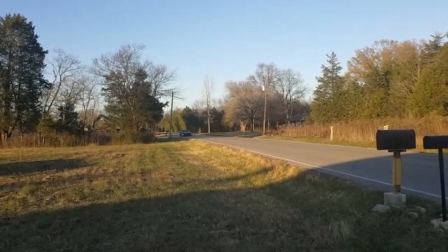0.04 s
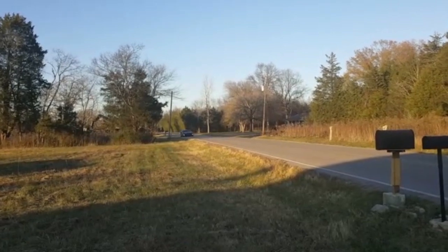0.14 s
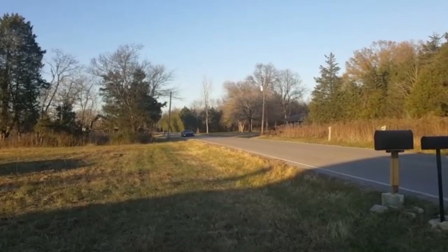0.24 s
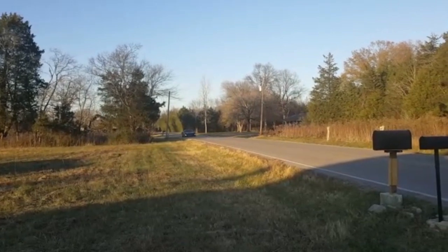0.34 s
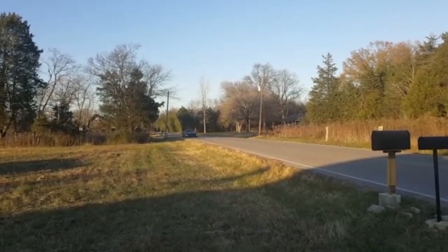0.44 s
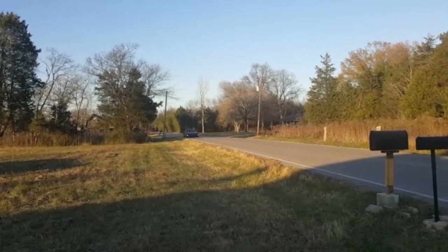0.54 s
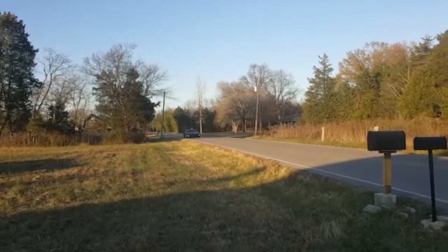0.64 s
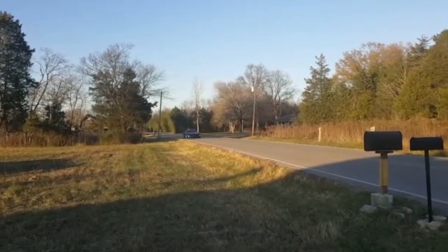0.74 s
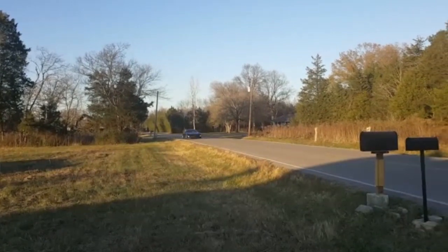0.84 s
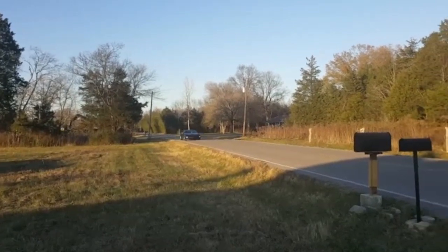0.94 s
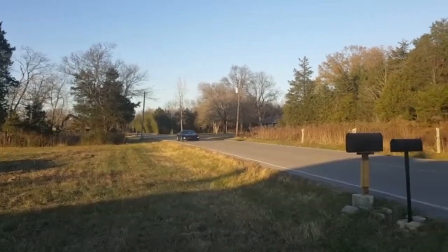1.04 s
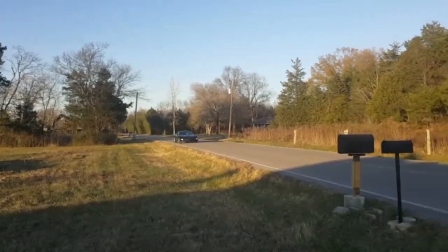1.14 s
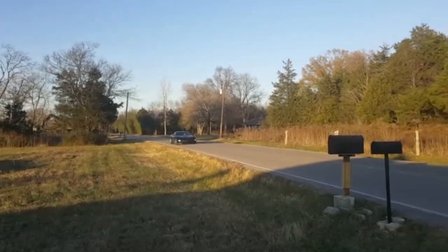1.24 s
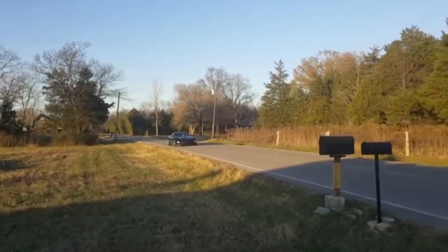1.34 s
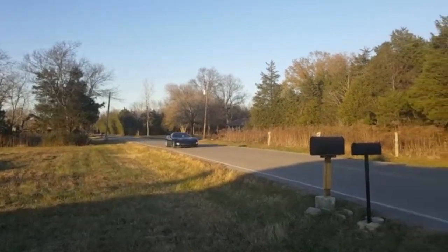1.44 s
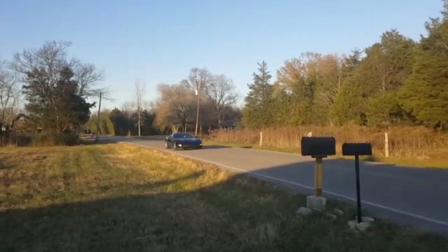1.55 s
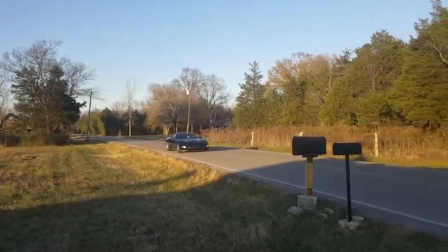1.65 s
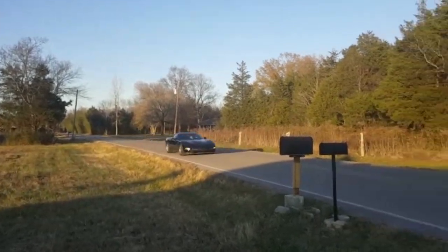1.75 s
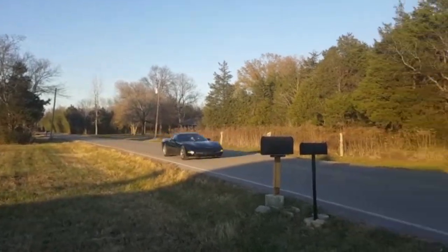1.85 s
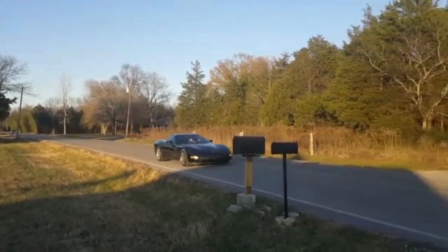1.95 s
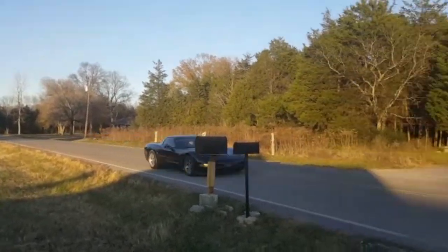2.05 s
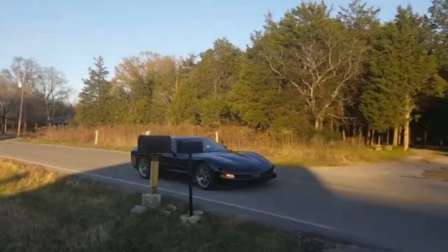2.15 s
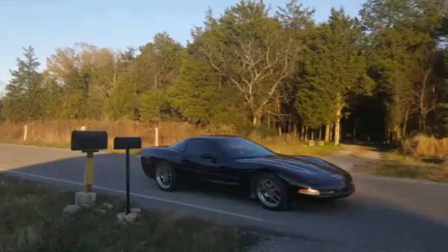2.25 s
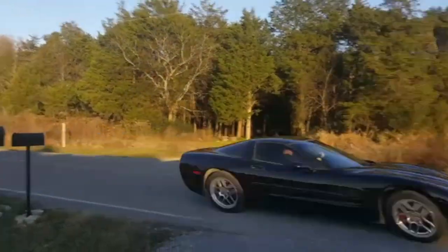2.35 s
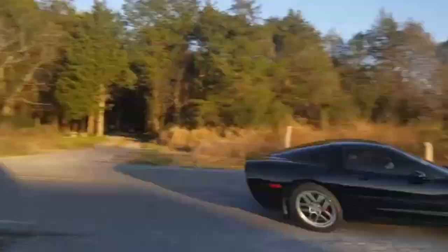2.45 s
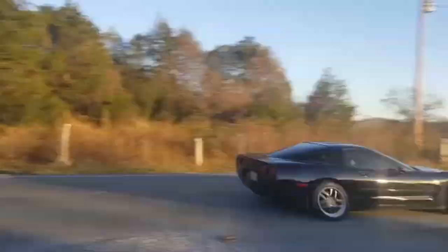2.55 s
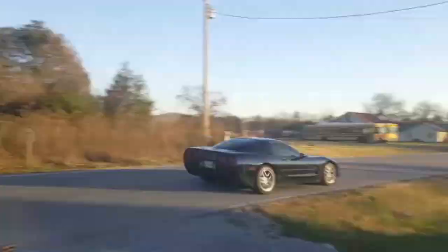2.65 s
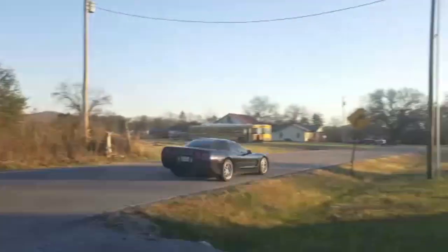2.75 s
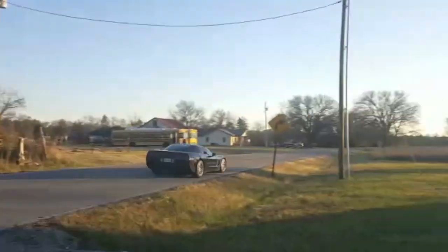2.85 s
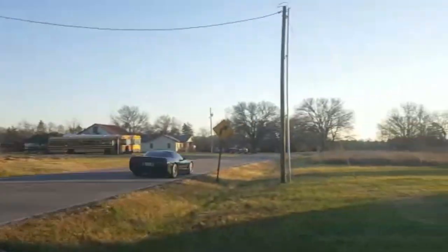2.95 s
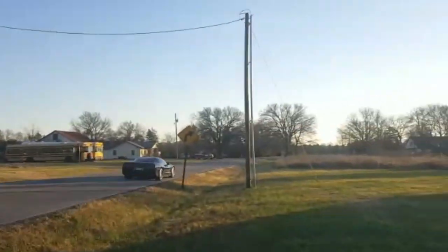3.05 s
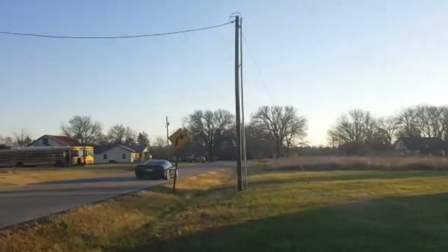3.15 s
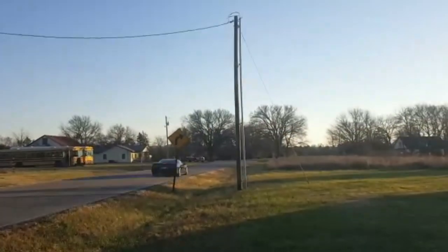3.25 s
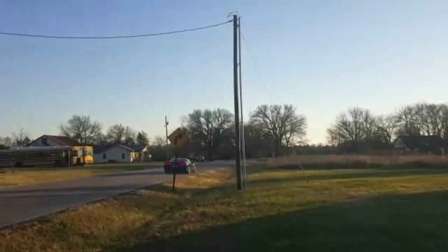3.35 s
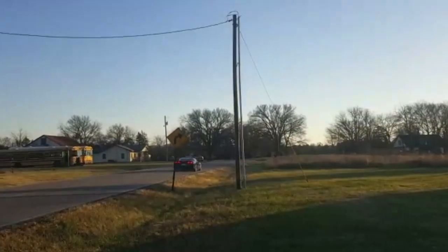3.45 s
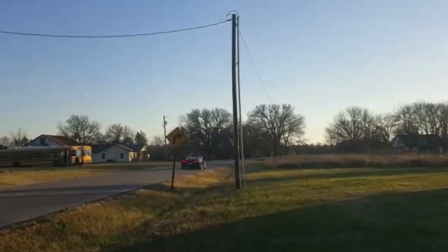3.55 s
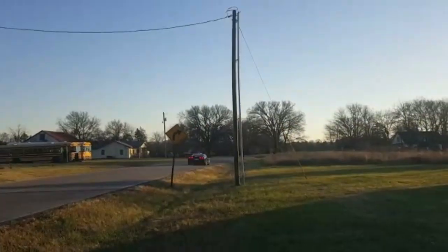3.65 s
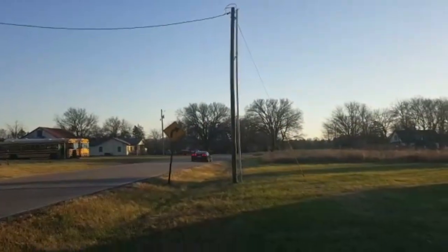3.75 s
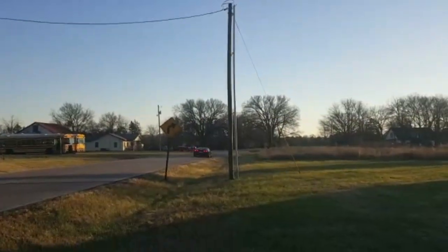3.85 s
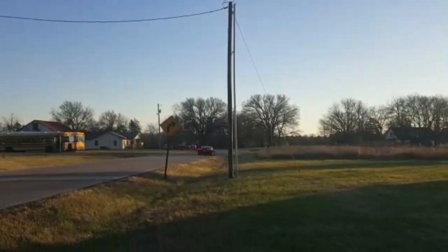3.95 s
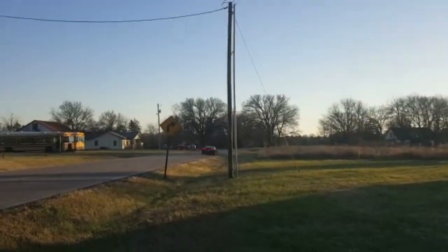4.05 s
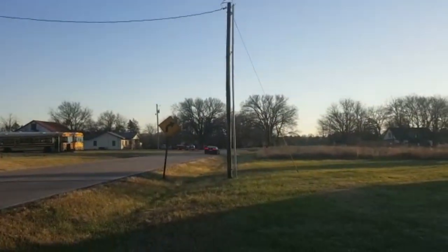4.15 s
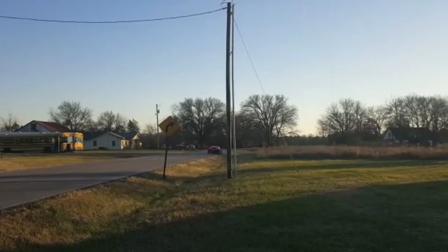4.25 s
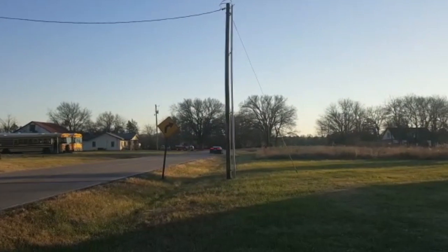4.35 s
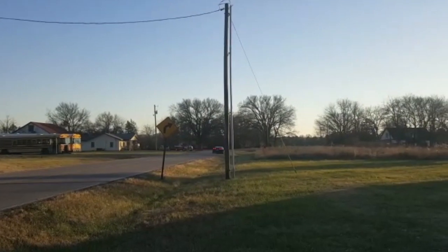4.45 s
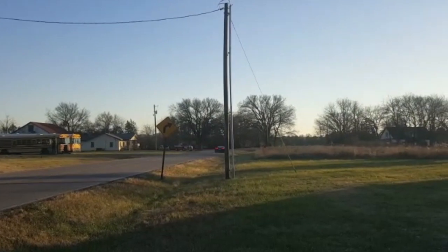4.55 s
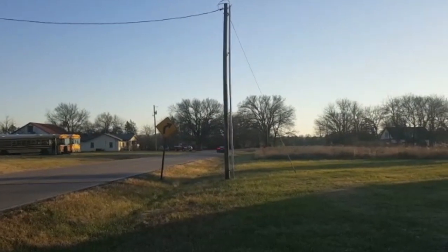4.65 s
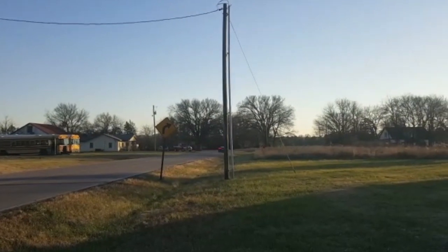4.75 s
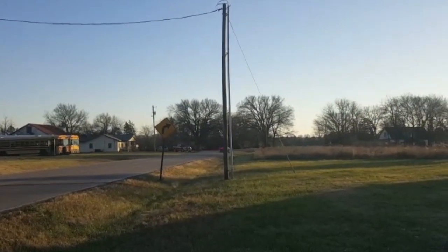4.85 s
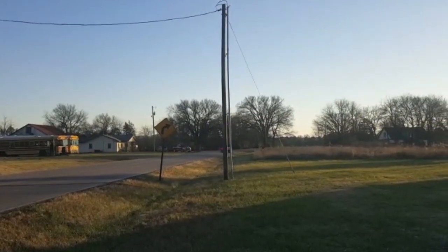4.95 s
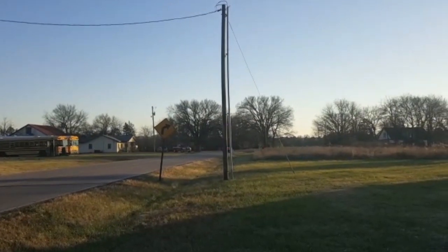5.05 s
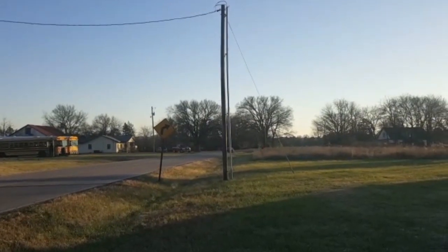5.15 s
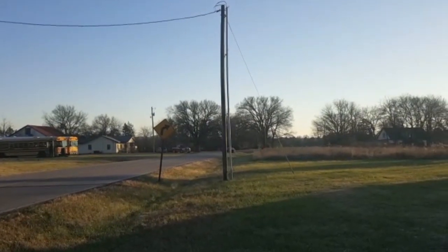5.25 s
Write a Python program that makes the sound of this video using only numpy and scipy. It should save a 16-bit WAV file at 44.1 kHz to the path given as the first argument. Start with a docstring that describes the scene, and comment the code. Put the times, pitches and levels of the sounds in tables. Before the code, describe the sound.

Distant V8 hum bursts into full-throttle roar, blasts by very close with a sharp pitch fall, stumbles briefly, then growls into the distance.

```python
"""A country road, microphone at the verge: a V8 car with open pipes cruises up, opens the throttle and passes
close by. Uneven firings sum engine orders into a deep burble and pulse filtered noise into a cracking rasp;
shock fronts ring bright resonances, and knocks and thumps ring the pipes. Doppler lowers the pitch as it
passes, and the beat changes with the load. Clean overtones and forward-thrown whines go with it; tyre hiss and
low wind are shaped noise. Ground and trees return echoes, and the loudest peaks at the two microphone ports are
squashed."""
import sys
import numpy as np
from scipy import signal
from scipy.fft import rfft, irfft, next_fast_len
from scipy.io import wavfile
from scipy.ndimage import uniform_filter1d, map_coordinates

SR = 44100
rng = np.random.default_rng(int(sys.argv[2]) if len(sys.argv) > 2 else 0)


def unload_wav(signal):
    """Save mono or channel-first audio to the path in sys.argv[1] as 16-bit WAV at rate SR, clipped to [-1, 1]."""
    wavfile.write(
        sys.argv[1],
        SR,
        np.round(np.clip(np.atleast_2d(signal).T, -1, 1) * 32767).astype(np.int16),
    )


N = 234283

# The exhaust's voice goes cruising, charging, alongside, leaving, far off. Start of each later phase: (time [s])
PHASE_STARTS = [0.886, 2.362, 2.735, 3.875]
# The drive past: road speed, moment the tailpipes are abreast of the microphone, closest distance
CAR_M_PER_S, PASS_S, NEAREST_M = 27.7, 2.606, 2.02
SOUND_M_PER_S = 343


def from_db(db):
    """Decibels to an amplitude factor."""
    return 10 ** (np.asarray(db) / 20)


def rms_one(x):
    """Scale a sound to an rms of 1."""
    return x / np.sqrt(np.mean(x ** 2) + 1e-20)


def in_time(rows):
    """Each column of a timed curve, interpolated at every sample."""
    s, *columns = np.transpose(rows)
    return [np.interp(np.arange(N) / SR, s, column) for column in columns]


def drift(rate_hz):
    """Slow chance with spread 1: noise through two equal low-pass poles, made at every 40th sample."""
    r = np.exp(-80 * np.pi * rate_hz / SR)
    slow = signal.lfilter([1], [1, -2 * r, r * r], rng.standard_normal(N // 40 + 2002))
    slow = slow[2000:]  # skip the filter's start
    return np.interp(np.arange(N) / 40, np.arange(len(slow)), rms_one(slow))


def swell(s, half_width_s):
    """A bell-shaped rise and fall of height 1."""
    return np.exp(-((np.arange(N) / SR - s) / half_width_s) ** 2)


def colour(x, points, power=1):
    """Shape a sound by a smooth (frequency [Hz], gain [dB]) spectrum; power scales the dB."""
    size = next_fast_len(N + 4096, True)
    hz, db = np.transpose(points)
    bins = np.maximum(np.arange(size // 2 + 1) * SR / size, 1)
    gain = from_db(power * np.interp(np.log(bins), np.log(hz), db))
    return irfft(rfft(x, size) * gain, size)[..., :N]


def butter(x, hz, kind, order=2):
    """Pass a sound through a Butterworth filter."""
    return signal.sosfilt(signal.butter(order, hz, kind, fs=SR, output="sos"), x)


def steady(x):
    """Even out slow swells of a (mid, side) pair, keeping its pulses."""
    power = uniform_filter1d(uniform_filter1d(x[0] ** 2, size=2600), size=2600)
    return x / np.sqrt(np.abs(power) + 1e-20)


def delayed(x, lag_ms):
    """Read a sound through a delay that changes with time."""
    return map_coordinates(x, [np.arange(N) - lag_ms * SR / 1000], order=3, mode="nearest")


def ports(pair):
    """Two takes on one sound become (mid, side): the ports differ most in deepest bass and top treble."""
    # Sound the two ports do not share: (frequency [Hz], side gain [dB])
    port_spread = [(60, 1), (150, -21), (300, -6.5), (640, -14.5), (1400, -8), (3100, -6), (6800, 0.5),
                   (15000, 3)]
    return np.array([pair[0], colour(pair[1], port_spread)])


def noise(spectrum):
    """Coloured (mid, side) noise whose mid has spread 1."""
    x = ports(colour(rng.standard_normal((2, N)), spectrum))
    return x / np.std(x[0])


def position(lead_m=0):
    """Nearness (1 when abreast) and heading (-1 coming, +1 going) of a point on the car."""
    along = CAR_M_PER_S * (np.arange(N) / SR - PASS_S) + lead_m
    distance = np.hypot(along, NEAREST_M)
    return NEAREST_M / distance, along / distance


def phase_shares(blend_s=0.091):
    """Equal-power cross-fades between the five phases."""
    t = np.arange(N) / SR
    later = [np.clip((t - s) / blend_s + .5, 0, 1) for s in PHASE_STARTS]
    begun = [np.ones(N)] + later + [np.zeros(N)]
    return np.sqrt(np.maximum(-np.diff(begun, axis=0), 0))


def by_phase(rows, shares):
    """A level that starts afresh in each phase and slides at a steady rate (dB)."""
    t = np.arange(N) / SR
    return sum(share ** 2 * (db + db_per_s * (t - start))
               for share, start, (db, db_per_s) in zip(shares, [0, *PHASE_STARTS], rows))


def exhaust_levels(shares):
    """Levels (dB) of the note's firing tone, burble and rumble, and of the jet's bark, rasp and sizzle."""
    # Deep exhaust note, then sizzle of the gas jet, once the throttle has opened: (time [s], level [dB])
    note_level = [(0.9, -28), (0.925, -23), (0.95, -27), (1.31, -19.5), (2.12, -14.5), (2.31, -20.5),
                  (2.44, -9), (2.51, -12), (2.54, -14), (2.622, -7.5), (2.66, -20), (2.7, -9),
                  (2.76, -20.5), (2.83, -18), (2.9, -19), (3.1, -20), (3.81, -17), (3.845, -26.5),
                  (3.909, -19.5), (3.98, -16), (4.38, -14), (5.08, -13.5), (5.17, -13.5), (5.259, -16.5),
                  (5.31, -17.5)]
    sizzle_level = [(0.92, -43), (1.41, -26), (1.8, -25.5), (2.25, -34), (2.48, -26.5), (2.53, -23.5),
                    (2.58, -23.5), (2.632, -36.5), (2.77, -43.5), (3.05, -35), (3.461, -35), (3.57, -31.5),
                    (3.845, -32), (3.885, -40), (4.0, -34), (4.99, -43.5), (5.31, -46)]
    # One row a phase: firing tone over burble, then rumble re the note: (start level [dB], slope [dB/s])
    tone_over_burble = [(-36, 4), (-14.5, 14.5), (12.5, 6), (-18, 5), (-9.5, 13.5)]
    rumble_share = [(0, -9), (2, -13.5), (-17, -11.5), (-13.5, -2), (-21.5, 2.5)]
    # Jet bark and rasp at the usual sizzle, one row a phase: (start level [dB], slope [dB/s])
    bark_level = [(-35, 7), (-23.5, -3), (-22, -14), (-29, -5.5), (-32.5, 5)]
    rasp_level = [(-32.5, 1), (-29, 5), (-27.5, -4.5), (-30.5, -2.5), (-31, 3)]
    # Short surges: (time [s], half-width [s], extra rumble [dB], extra bark [dB], extra rasp [dB])
    surges = [(.922, 0.0051, 8, -2, 5.5), (2.535, 0.046, 19.5, 7, -5), (2.585, 0.026, -2, 1.5, 7.5),
              (2.652, 0.011, 13.5, 9, -3), (2.85, 0.25, 12, 3, 5), (3.68, 0.086, 2.5, 2.5, 4.5),
              (3.861, 0.043, 9, 10, 2), (5.069, 0.099, -11, 3, 6)]
    t, cruising = np.arange(N) / SR, shares[0] ** 2
    # Both creep up while cruising: dB at the start, then dB per s
    cruise_note = -41 + 7.4 * t
    cruise_sizzle = -63.5 + 1.0 * t
    note = cruising * cruise_note + (1 - cruising) * in_time(note_level)[0]
    sizzle = cruising * cruise_sizzle + (1 - cruising) * in_time(sizzle_level)[0]
    more_rumble, more_bark, more_rasp = sum(
        np.outer(extra_db, swell(s, width)) for s, width, *extra_db in surges)
    tone = by_phase(tone_over_burble, shares)
    rumble = by_phase(rumble_share, shares) + more_rumble
    # Share the note's power between its parts
    lines = note - 10 * np.log10(1 + from_db(rumble) ** 2)
    burble = lines - 10 * np.log10(1 + from_db(tone) ** 2)
    # The lower jet bands follow part of the sizzle's swing
    swing = sizzle - np.median(sizzle)
    bark = by_phase(bark_level, shares) + 0.5 * swing + more_bark
    rasp = by_phase(rasp_level, shares) + 0.73 * swing + more_rasp
    return (burble + tone, burble, lines + rumble), (bark, rasp, sizzle)


def ring_angles(orders, size=64):
    """A pipe rings after its blast, never before: minimum phase of each order."""
    k, db = np.transpose(orders)
    log_gain = np.interp(np.arange(size // 2 + 1), [0, *k, 18], [-40, *db, -40]) * np.log(10) / 20
    return rfft(2 * irfft(log_gain)[:size // 2], size).imag


def exhaust_note(turns, shares, levels, waver_db=1.56, firing_waver_db=2.5, firing_db=-0.23,
                 burble_db=0.0, rumble_db=-0.5, settle=0.34):
    """The firing tone, the other orders that the uneven banks add, and turbulence between them."""
    # Burble, one list a phase, scaled to a common power: (multiple of the cycle rate, relative level [dB])
    burble_orders = [
        [(2, -19), (3, -5.5), (4, -1), (5, 3.5), (6, -25), (7, -6.5), (9, -40), (10, -22)],
        [(2, -23), (3, -16), (4, -24), (5, -6), (6, -0.5), (7, -9.5), (9, -22), (10, -23), (11, -19.5),
         (13, -18.5)],
        [(2, -42), (3, -30), (4, -48), (5, -23.5), (6, -13.5), (7, -24), (9, -29), (10, -18.5), (11, -18),
         (12, -28)],
        [(3, -8), (4, -0.5), (5, 7), (6, 8), (7, 0.5), (9, -22.5), (10, -8), (11, -17), (12, -11.5), (13, -61)],
        [(3, -17), (4, -6), (5, -8), (6, 3), (7, -14.5), (9, -10), (10, -29.5), (12, -16.5), (13, -30.5)],
    ]
    # Turbulent rumble: (frequency [Hz], relative level [dB])
    rumble_spectrum = [(35, -45.5), (70, -23.5), (120, 10.5), (200, 16.5), (290, 11.5), (380, 2), (480, -4),
                       (700, -54)]
    firing, burble, rumble = levels
    angle = 2 * np.pi * turns
    unrest = 1 - settle * (shares[3] ** 2 + shares[4] ** 2)  # the beat is steadier once the car has passed
    waver = {k: from_db(waver_db * unrest * drift(6)) for k in range(2, 14)}
    beat = np.zeros(N)
    for share, orders in zip(shares, burble_orders):
        on, lead = share > 0, ring_angles(orders)
        total = np.sqrt(sum(from_db(db) ** 2 for k, db in orders) / 2)
        for k, db in orders:
            k = round(k)
            wave = np.cos(k * angle[on] + lead[k] + np.pi / 2)
            beat[on] += (share * waver[k])[on] * from_db(db) / total * wave
    tone_db = firing + firing_db + firing_waver_db * unrest * drift(12)
    tone = np.sqrt(2) * np.cos(8 * angle + np.pi / 6) * from_db(tone_db)  # eight firings a cycle
    lines = tone + beat * from_db(burble + burble_db)
    return lines * [[1], [0]] + steady(noise(rumble_spectrum)) * from_db(rumble + rumble_db)


def blasts(turns, strengths_db, decay, flow, scatter_db):
    """Each firing opens with a jump and dies away over the steady flow."""
    count, age = np.divmod(8 * turns, 1)
    count = count.astype(int)
    scatter = scatter_db * rng.standard_normal(count[-1] + 1)
    size = from_db(np.resize(strengths_db, count[-1] + 1) + scatter)
    return flow + size[count] * np.exp(-age / decay)


def gas_jet(turns, shares, levels, repeat_db=0.0, repeat_hz=1700, bark_db=-1.0, rasp_db=-3.0,
            sizzle_db=2.0, flicker_db=0.88, morph_hz=.5):
    """Blasts carry a slowly changing ripple that repeats each cycle; fresh turbulence rules the treble."""
    # Eight firings of the cycle, one row a phase: (relative strength [dB]) in each column
    firing_strengths = [
        [0, -3, -4, -2, 0, -3, -4, -2],
        [0, -2, -3, -1, 0, -1, -3, -2],
        [0, -2, -3, -1, 0, -1, -3, -2],
        [0, -8, -5, -8, -6, -7, -8, -12],
        [0, -2, -5, -8, 0, -1, -6, -8],
    ]
    # One row a phase: (decay [firing intervals], steady flow [amplitude], scatter [dB, sign immaterial])
    blast_shapes = [(0.99, 1, -1), (1, 1, -1), (0.62, 1, 4), (0.25, 0.33, 2.5), (0.75, 0.97, 5)]
    # Jet colour in each phase: (frequency [Hz], relative level [dB])
    cruise_colour = [(240, -31), (400, -4), (477, -7), (496, -13), (553, -7), (714, -11.5), (1960, -19.5),
                     (2530, -16), (7240, -49), (10000, -53), (13000, -77), (22000, -120)]
    charge_colour = [(240, -52), (400, -22), (538, -2), (591, 0), (760, 3), (1110, 0.5), (1210, -3.5),
                     (1360, -2.5), (1540, -0.5), (1670, -1.5), (2640, -5.5), (3450, -16), (4460, -19),
                     (7140, -34.5), (8280, -29.5), (10300, -54.5), (12000, -32), (15000, -46),
                     (22000, -120)]
    beside_colour = [(290, -19), (490, -15.5), (689, -15), (753, -1.5), (843, -18), (956, -4), (1100, -17),
                     (1750, 1), (2070, -3.5), (3250, -12.5), (10000, -38), (13000, -56), (22000, -120)]
    leave_colour = [(240, -38.5), (400, -13.5), (470, -2), (641, -2), (704, 2.5), (1190, -4), (1310, -12.5),
                    (1760, 0.5), (2100, -7), (2530, -8), (3640, -11), (4580, -17.5), (7140, -35),
                    (8170, -28.5), (10000, -55.5), (13000, -75), (22000, -120)]
    far_colour = [(240, -38), (400, 5), (510, -14.5), (641, -11.5), (753, -2.5), (1080, -4), (1500, -6.5),
                  (1760, 0), (2100, -10), (2640, -11.5), (3060, -11.5), (4340, -21), (7050, -44.5),
                  (8170, -40), (10000, -58.5), (13000, -95), (22000, -120)]
    colours = (cruise_colour, charge_colour, beside_colour, leave_colour, far_colour)
    size = 1024  # points of ripple in a cycle
    shapes = rng.standard_normal((2, 2, size))[..., (turns % 1 * size).astype(int)]
    morph = 2 * np.pi * morph_hz * np.arange(N) / SR
    ripple = shapes[0] * np.cos(morph) + shapes[1] * np.sin(morph)
    loaded = 1 - 0.44 * shares[0]  # on light throttle the cycles are less alike
    repeating = loaded * from_db(repeat_db) * butter(ripple, repeat_hz, "low", order=1)
    gas = repeating + rng.standard_normal((2, N))
    jet = 0
    for share, firings, shape, spectrum in zip(shares, firing_strengths, blast_shapes, colours):
        jet = jet + share * rms_one(colour(gas * blasts(turns, firings, *shape), spectrum))
    jet = ports(jet)
    bands = ((460, 1200), (1200, 3000), (3000, 9500))  # bark, rasp and sizzle, Hz
    return sum(steady(butter(jet, band, "band", order=4)) * from_db(level + trim + flicker_db * drift(15.0))
               for band, level, trim in zip(bands, levels, (bark_db, rasp_db, sizzle_db)))


def each_cycle(turns, rows, level_db, scatter_db):
    """Clicks that return at the same place in every engine cycle, with a little scatter in strength."""
    clicks = np.zeros(N)
    for start, end, place, db in rows:
        at = np.flatnonzero(np.diff(np.floor(turns - place / 8)))
        heard = (at > start * SR) & (at < end * SR)
        scatter = scatter_db * rng.standard_normal(256)[:len(at)]
        clicks[at] += heard * from_db(level_db[at] + db + scatter)
    return clicks


def shocks(turns, levels, scatter_db=1.1, mode_scatter_db=1.5, front_s=0.00015, front_db=2,
           puff_s=0.0007, puff_db=-11):
    """The strongest blasts steepen into shock fronts: a spike and a small puff that ring a few bright
    resonances."""
    # Once-a-cycle fronts: (from [s], to [s], place in cycle [firing intervals], click re sizzle level [dB])
    shock_runs = [(2.96, 3.45, -0.17, 20.5), (3.45, 3.85, -0.17, 22), (2.92, 3.82, 1.5, 18.5),
                  (3.5, 3.85, 4.3, 14), (3.93, 4.45, 0.15, 16), (3.93, 5.31, 4.05, 13.5)]
    # Single louder cracks: (time [s], click level before ringing [dB])
    cracks = [(.886, -31), (.912, -27), (2.553, -14), (2.571, -11), (2.585, -11), (2.642, -19),
              (2.697, -19), (3.2202, -19), (3.2778, -17), (3.3423, -15), (3.6007, -16), (3.69, -15),
              (3.707, -16), (3.8097, -16), (3.9439, -14), (4.2128, -17), (5.119, -20)]
    # Resonances the fronts ring: (frequency [Hz], width [Hz], level from near [dB], level from far [dB])
    ring_modes = [(1760, 110, -4, 5), (2550, 300, 0, -4), (3050, 280, -6, 11), (3650, 450, 4, 5),
                  (4400, 750, 13, 4)]
    t = np.arange(N) / SR
    clicks = each_cycle(turns, shock_runs, levels[2], scatter_db)
    for s, db in cracks:
        clicks[round(s * SR)] += from_db(db)
    front, puff = (signal.lfilter([1], [1, -np.exp(-1 / (decay * SR))], clicks + 1e-18)
                   for decay in (front_s, puff_s))
    burst = front * [[1], [0]] + from_db(puff_db) * puff * rng.standard_normal((2, N))
    far = np.clip((t - 3.48) / .35 + .5, 0, 1)  # near ring turns to far ring around 3.48 s, over .35 s
    out = from_db(front_db) * burst
    for hz, width, near_db, far_db in ring_modes:
        r = np.exp(-np.pi * width / SR)
        poles = [1, -2 * r * np.cos(2 * np.pi * hz / SR), r * r]
        rung = signal.lfilter(np.array([1, 0, -1]) * (1 - r * r) / 2, poles, burst)
        out = out + rung * from_db(near_db + (far_db - near_db) * far + mode_scatter_db * drift(23))
    out = (1 - far) * out + far * butter(out, 5000, "low", order=4)  # distance takes the edge off
    return ports(butter(butter(out, 500, "high"), 7200, "low", order=8))


def knocks(turns, levels, level_db=0.0, scatter_db=1.0, mode_waver_db=1.5):
    """Heard from behind, blunter blows ring the lower pipe modes much alike each cycle: a stack of clean lines."""
    # Once-a-cycle blows: (from [s], to [s], place in cycle [firing intervals], click re bark level [dB])
    knock_runs = [(2.95, 3.2, -0.1, 11.5), (2.87, 3.85, 1.85, 9), (2.87, 3.85, 3.3, 8),
                  (3.15, 3.85, 4.55, 9), (3.2, 3.85, 0.5, 9), (3.94, 4.35, 4.65, 16),
                  (4.35, 5.31, 4.65, 13), (4.1, 5.31, 3.9, 12), (4.1, 5.31, 0.7, 13.5),
                  (4.85, 5.31, -0.15, 9)]
    # Lower pipe modes: (frequency [Hz], width [Hz], level [dB])
    knock_modes = [(670, 230, -3.5), (930, 260, -4.5), (1110, 300, -8)]
    clicks = each_cycle(turns, knock_runs, levels[0] + level_db, scatter_db)
    out = 0
    for hz, width, db in knock_modes:
        r, w = np.exp(-np.pi * width / SR), 2 * np.pi * hz / SR
        poles = [1, -2 * r * np.cos(w), r * r]
        rung = signal.lfilter([1, -np.cos(w) * r], poles, clicks + 1e-18)
        out = out + from_db(db + mode_waver_db * drift(3.4)) * rung
    return butter(out, [430, 1500], "band") * [[1], [0]]


def thumps(rise_s=.005):
    """Each thump swells within about a cycle of the pipes' lowest ring and dies in a few more."""
    # Deep single thumps, most as the engine stumbles: (time [s], ring [Hz], envelope peak [dB])
    thump_rows = [(2.845, 235, -13), (3.837, 217, -8), (3.856, 215, -10.5), (3.881, 215, -9),
                  (3.917, 215, -13)]
    out = np.zeros(N)
    for s, hz, db in thump_rows:
        age = np.maximum(np.arange(N) / SR - s, 0)
        envelope = age / rise_s * np.exp(1 - age / rise_s)
        out += from_db(db) * envelope * np.cos(2 * np.pi * hz * age)
    return butter(out, 120, "high") * [[1], [0]]


def overtones(turns, level_db=-0.5, fade_db=1.5, wander=0.18):
    """Clean engine orders, each a sine locked to the cycle that swells and fades at its own time."""
    # Orders: (multiple of the cycle rate, loudest at [s], half-width [s], level before trim [dB])
    ringing_orders = [ (7, 1.12, .22, -30), (8, 1.0, .1, -33), (40, 1.72, .24, -24.5), (39, 1.76, .2, -27),
                      (46, 1.78, .35, -31), (18, 1.88, .18, -31), (30, 1.9, .14, -26), (32, 1.88, .32, -28),
                      (41, 1.95, .35, -30), (38, 2.02, .33, -21), (37, 2.25, .25, -29.5),
                      (22, 2.11, .26, -24), (14, 2.33, .24, -30), (11, 2.55, .1, -25), (10, 2.59, .06, -23),
                      (36, 2.35, .1, -29), (12, 2.61, .05, -27), (6, 2.7, .06, -25), (4, 2.77, .09, -27),
                      (12, 2.81, .06, -33), (11, 2.88, .1, -33), (7, 2.8, .07, -20), (9, 2.93, .15, -33),
                      (10, 2.91, .13, -34), (24, 3.05, .15, -36), (21, 3.28, .49, -36), (20, 3.37, .3, -37),
                      (52, 3.69, .16, -31), (47, 3.75, .2, -36), (28, 4.0, .15, -36), (30, 4.03, .1, -36),
                      (22, 4.18, .16, -32), (20, 4.3, .25, -34), (25, 4.31, .19, -37), (21, 4.55, .3, -35),
                      (29, 4.66, .19, -37), (30, 5.07, .15, -33), (22, 5.1, .2, -34), (37, 5.1, .11, -36),
                      (24, 5.17, .16, -34), (32, 5.17, .14, -35), (40, 5.08, .1, -35), (16, 5.1, .4, -41),
                      (14, 5.1, .3, -42), (10, 5.15, .2, -37)]
    out = np.zeros((2, N))
    for k, s, width, db in ringing_orders:
        height = swell(s, width)
        on = height > .01
        angle = 2 * np.pi * (round(k) * turns[on] + rng.random((2, 1))) + wander * drift(12)[on]
        level = from_db(db + level_db + fade_db * drift(12)[on])
        out[:, on] += np.sqrt(2) * height[on] * level * np.cos(angle)
    return ports(out) * [[1], [.5]]


def whines(turns, level_db=0.0, waver_db=1.5, wander=.2, rise_s=.14):
    """Intake and belt tones: they rise as the throttle opens and are thrown forward, so they die as it passes."""
    # Levels are before the throttle and facing factors:
    # (multiple of the cycle rate, level from afar [dB], loudest at [s], level then [dB], half-width [s])
    whine_rows = [(16, -30.5, 2.335, -16.5, .1), (19, -44, 2.54, -18.5, .17), (24, -43, 2.54, -14, .48)]
    throttle = np.clip((np.arange(N) / SR - PHASE_STARTS[0]) / rise_s + .5, 0, 1)
    facing = (1 - position()[1]) / 2
    out = np.zeros((2, N))
    for k, far_db, s, top_db, width in whine_rows:
        db = far_db + (top_db - far_db) * swell(s, width)
        angle = 2 * np.pi * round(k) * turns + wander * drift(16)
        level = from_db(db + level_db + waver_db * drift(6.4))
        out += np.sqrt(2) * level * np.cos([angle, angle + 2 * drift(2.0)])
    return throttle * facing * ports(out)


def passing_air(shares):
    """Tyre hiss falls with distance and is weaker behind the car; the slipstream adds a gust to low buffeting."""
    # Tyre hiss, then wind: (frequency [Hz], relative level [dB])
    hiss_spectrum = [(3000, -44.5), (8000, 1), (10300, -15.5), (12000, -9.5), (16000, -15.5)]
    wind_spectrum = [(12, -9), (30, 11), (60, 19), (90, 28), (200, -50)]
    # Low buffeting of the air, one row a phase: (start level [dB], slope [dB/s])
    buffet_level = [(-46, -8), (-47.5, 0.5), (-63, 0), (-51.5, 0.5), (-49, 9.5)]
    near, heading = position(lead_m=1.2)  # the tyres lead the tailpipes
    fall_db, behind_db, cruise_db = 29.5, 20, 9  # losses: per tenfold distance, behind, cruising
    tyre_db = -30.5 + fall_db * np.log10(near)
    tyre_db = tyre_db - behind_db * np.maximum(heading, 0) ** 2 - cruise_db * shares[0] ** 2
    gust = from_db(-31) * swell(2.515, half_width_s=.035)
    wind = from_db(by_phase(buffet_level, shares)) + gust
    return noise(hiss_spectrum) * from_db(tyre_db) + noise(wind_spectrum) * wind


def ground_echo(pair, echo=0.27, waver=0.2):
    """An echo off road and verge, its delay sliding with distance and wavering, sweeps a comb through the rasp."""
    far_ms, near_ms = 0.16, 1.7  # delay from afar, and what is added when the car is nearest
    lag_ms = (far_ms + near_ms * np.sqrt(position()[0])) * np.exp(waver * drift(3.63))
    return np.array([x + echo * delayed(x, lag_ms) for x in pair]) / np.hypot(1, echo)


def tree_line(pair, dull_hz=420):
    """The trees return the deep note late, so the higher pitch of the approach lingers over the falling one."""
    # Dull echoes: (delay [s], level [dB])
    tree_echoes = [(.17, -22), (.26, -19), (.34, -22)]
    dull = butter(pair, dull_hz, "low", order=4)
    return pair + sum(from_db(db) * np.pad(dull, [(0, 0), (round(s * SR), 0)])[:, :N]
                      for s, db in tree_echoes)


def microphone(mid, side):
    """Two ports, each with its own colour, reached at slightly different times as the microphone turns."""
    # Port colour: (frequency [Hz], left-right tilt [dB, before each port's scaling])
    port_balance = [(60, 3), (300, 3.5), (700, 3), (1290, 4.5), (2380, 4.5), (3300, 1), (4400, -6),
                    (6000, -4.5), (8100, 2), (15000, 1)]
    # Car's bearing: (time [s], left lags right [ms], extra left minus right [dB])
    bearing = [(.5, -0.11, -3), (1.25, -0.087, -4), (1.75, -0.098, -3), (2.7, 0.0087, -4),
               (3.2, -0.085, -3.5), (3.75, 0.0053, -3.5), (4.4, -0.031, -3.5)]
    lag_ms, pan_db = in_time(bearing)
    left = delayed(colour(mid + side, port_balance, 0.76), lag_ms / 2) * from_db(pan_db / 2)
    right = delayed(colour(mid - side, port_balance, -0.64), -lag_ms / 2) * from_db(-pan_db / 2)
    return np.array([left, right])


def scene():
    """One crankshaft drives every engine sound; its pitch is raised while the car comes and lowered as it goes."""
    # Engine speed before Doppler, with a brief sag near 3.9 s: (time [s], cycle rate [cycles/s])
    engine_speed = [(0, 31.27), (0.8, 31.41), (1.15, 33.05), (1.5, 34.39), (1.85, 36.3), (2.3, 37.93),
                    (2.55, 38.03), (2.9, 37.69), (3.3, 37.08), (3.8, 36.03), (3.88, 33.59), (3.96, 35.45),
                    (4.3, 34.34), (4.7, 32.66), (5.31, 30.77)]
    doppler = 1 / (1 + CAR_M_PER_S / SOUND_M_PER_S * position()[1])
    turns = np.cumsum(in_time(engine_speed)[0] * doppler) / SR - .015  # in engine cycles
    valves = turns + .016  # the valves crack open just before the pressure peak
    shares = phase_shares()
    note_levels, jet_levels = exhaust_levels(shares)
    deep_note = tree_line(exhaust_note(turns, shares, note_levels) + thumps())
    tones = deep_note + overtones(turns) + whines(turns)
    jet = gas_jet(valves, shares, jet_levels)
    rasp = ground_echo(jet + shocks(valves, jet_levels) + knocks(valves, jet_levels))
    return microphone(*(tones + rasp + passing_air(shares)))


def record(dry, ceiling=0.92, cutoff_hz=16400):
    """The loudest peaks are squashed towards the ceiling, then the top is cut."""
    squashed = dry / (1 + (dry / ceiling) ** 8) ** (1 / 8)
    return signal.sosfilt(signal.cheby2(20, 70, cutoff_hz, fs=SR, output="sos"), squashed)


dry = scene()
out = record(dry)
unload_wav(out)
```